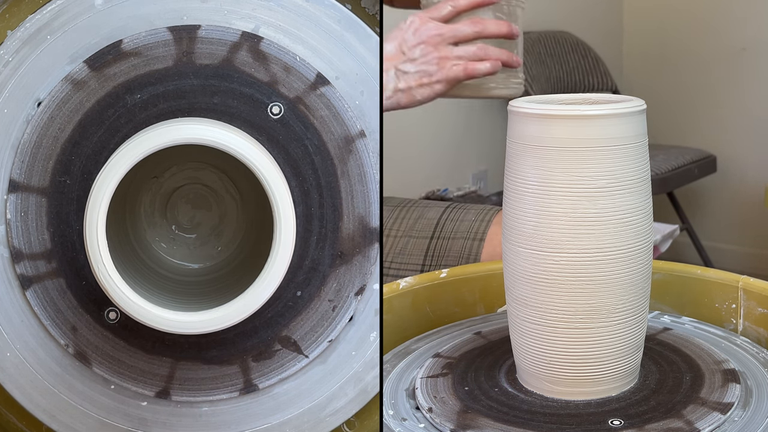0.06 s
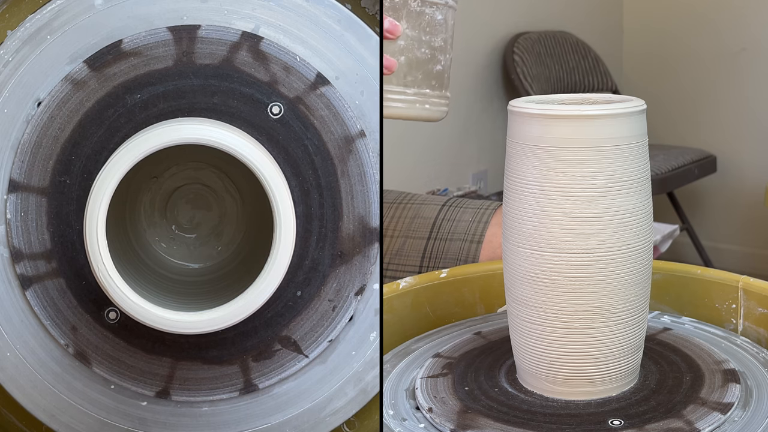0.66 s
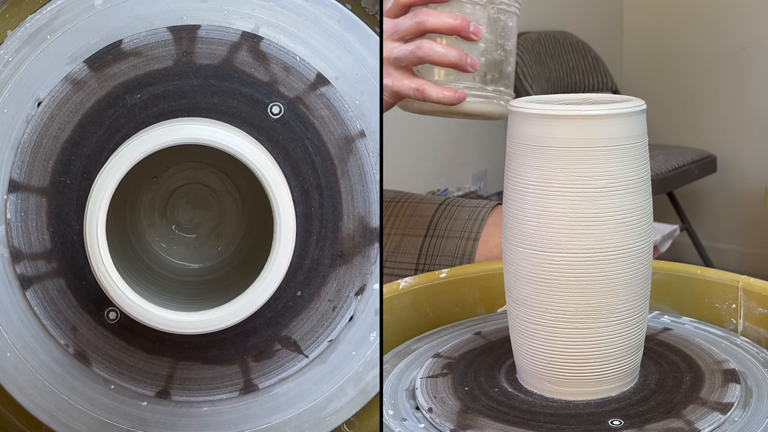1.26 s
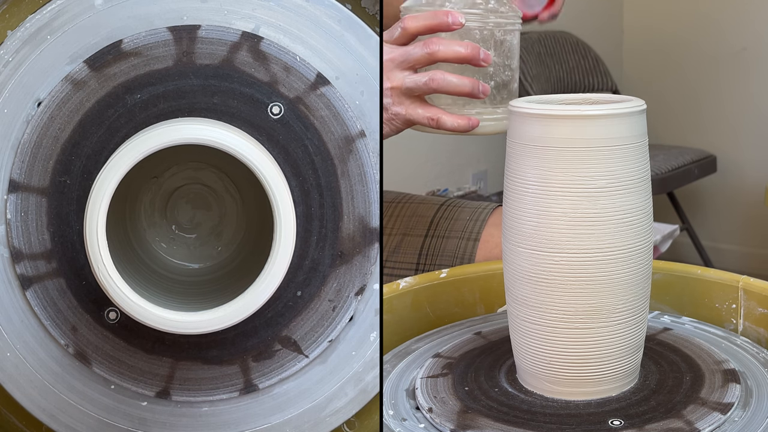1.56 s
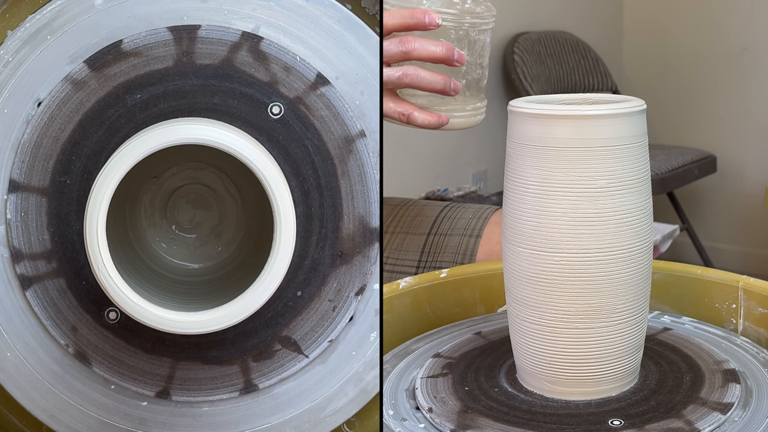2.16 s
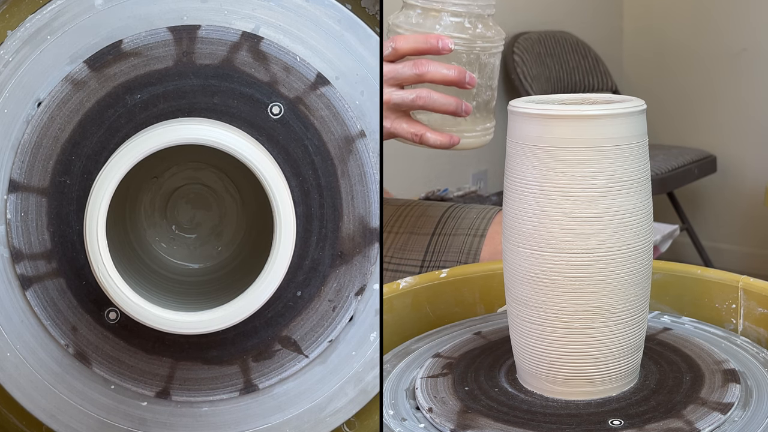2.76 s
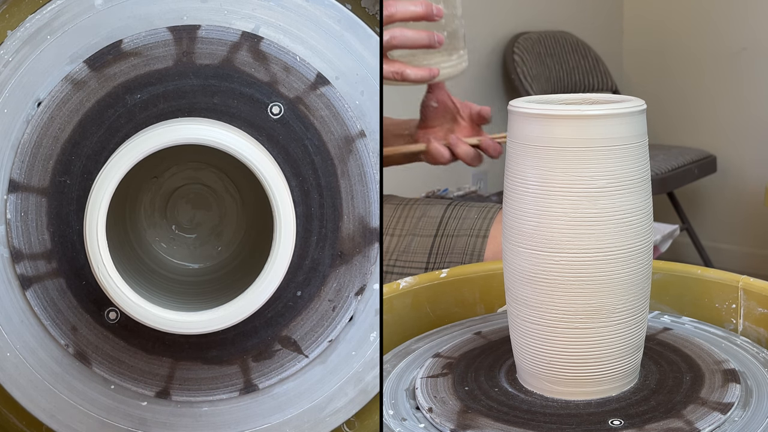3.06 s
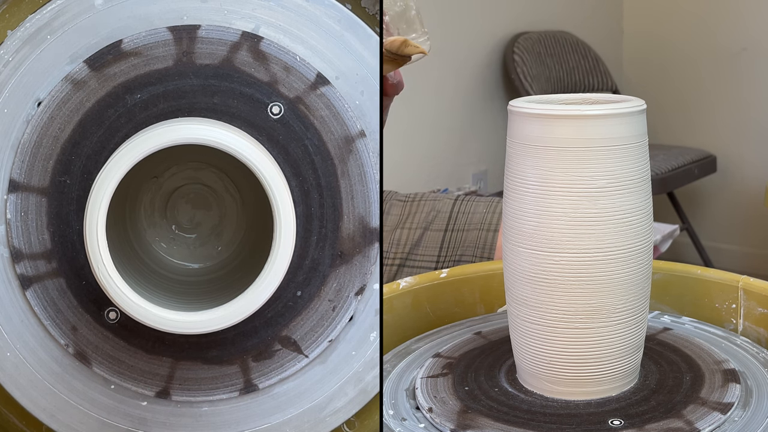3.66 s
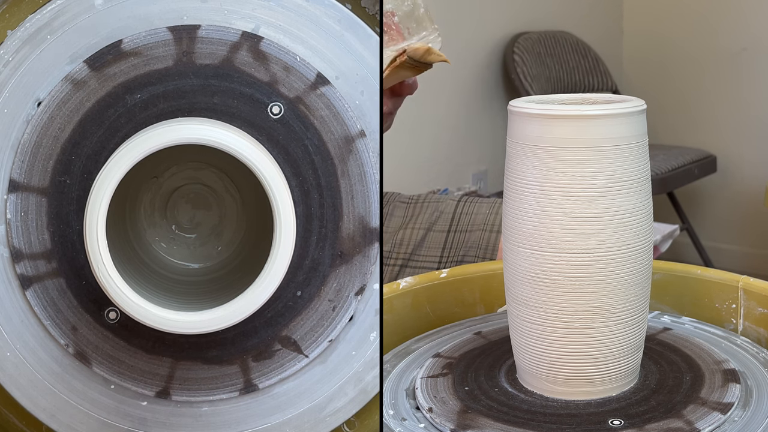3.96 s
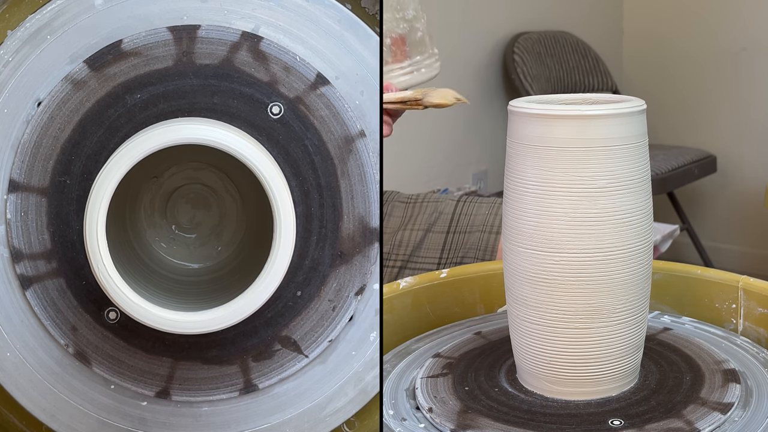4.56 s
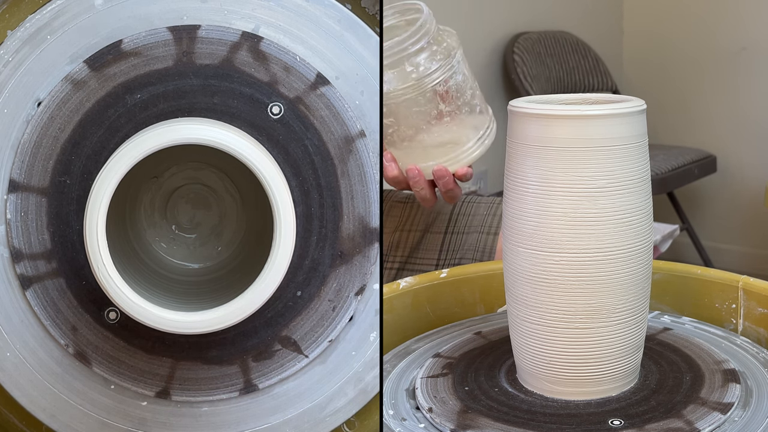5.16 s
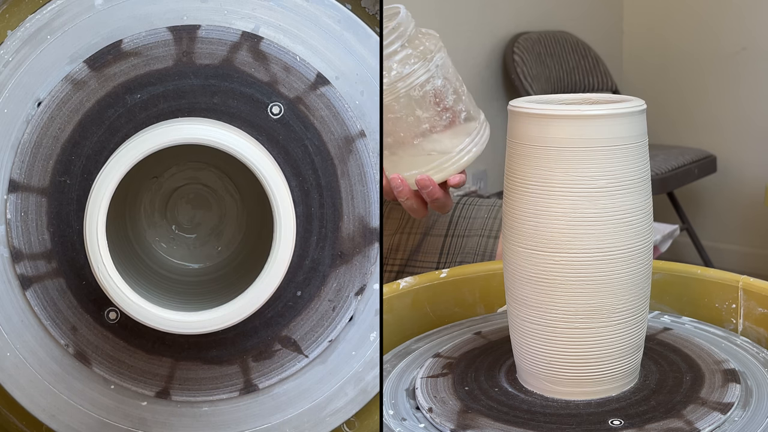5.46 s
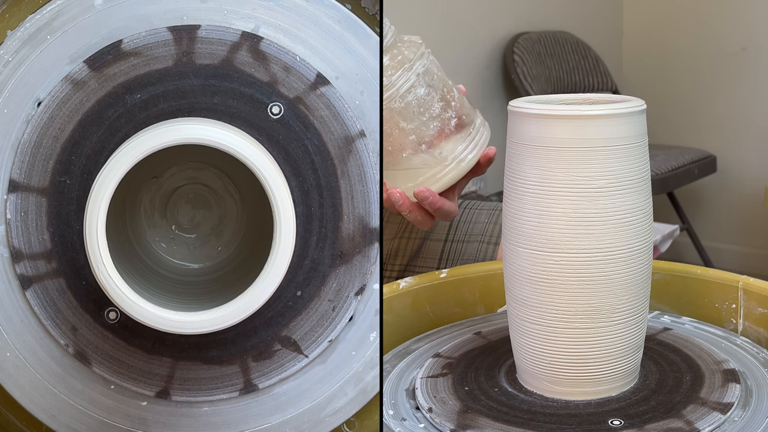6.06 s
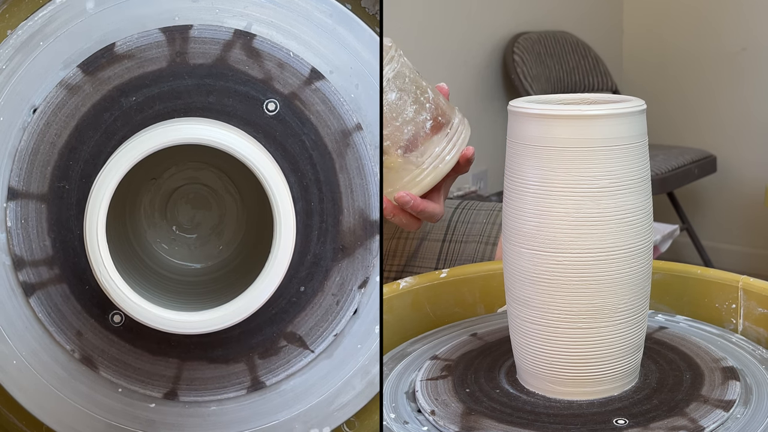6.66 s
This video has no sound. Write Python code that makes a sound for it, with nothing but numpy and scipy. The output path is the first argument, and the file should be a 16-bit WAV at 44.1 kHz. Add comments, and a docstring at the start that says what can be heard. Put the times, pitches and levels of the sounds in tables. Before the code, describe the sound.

Cloth rustles and fingers tick and bump softly on a held jar. Then a brush handle clatters against a glass in a quick run of bright, ringing clinks, scraping the rim as it is drawn out. A few light hollow taps and faint finger rubs follow, and near the end a pottery wheel motor starts to hum faintly. Close stereo microphones in a small, bare room with a low rumble.

```python
"""Brush drawn from a glass of tools

A potter handles a jar, then draws a brush from a glass of tools, clinking and scraping on the rim.
Fingers knock, rub and squeak on the held jar, cloth rustles, and near the end the wheel's motor
starts to hum. A small, bare studio, heard through a close stereo microphone pair."""
import sys
import numpy as np
from scipy import signal
from scipy.fft import rfft, irfft, next_fast_len
from scipy.io import wavfile

SR = 44100
rng = np.random.default_rng(int(sys.argv[2]) if len(sys.argv) > 2 else 0)


def transcribe(u):
    """Save the signal u as a 16-bit wav file named by the first command-line argument.

    u: samples, shape (n,) or (channels, n), limited to [-1, 1]; the rate is SR.
    q: integer samples, one column per channel.
    """
    v = np.clip(np.atleast_2d(u).T, -1, 1)
    q = np.round(v * 32767).astype(np.int16)
    wavfile.write(sys.argv[1], SR, q)


N = 304731
T = np.arange(N) / SR
RING_TIME = T[:SR]  # one second for each hit to ring out

# dry crack of a hard contact: (frequency [Hz], level [dB])
CRACK_SPECTRUM = [(30, -40.5), (150, -18.5), (600, -8), (1200, -9), (1900, -0.5), (2600, 4.5), (3200, -1),
                  (4200, 1), (6000, -5.5), (9000, -8.5), (12500, -17.5), (16000, -21)]


def clinks():
    """The brush handle cracks against the tool glass and bounces once; wall and hollow body ring."""
    # handle hits: (time [s], level [dB], hardness [Hz], body relative to wall [dB], bounce delay [s])
    hits = [(2.39, -67, 12000, 2.5, .002), (2.447, -56, 7400, 6.5, 0.0032), (2.456, -52.5, 5070, 3, 0.0017),
            (2.495, -41, 5000, -12, 0.0043), (2.5034, -21.5, 4630, -12, 0.0017),
            (2.528, -33.5, 9100, -3.5, 0.0036), (2.5376, -16.5, 13010, -6.5, .0018),
            (2.544, -24, 10000, -9, .002), (2.565, -32.5, 3500, -1, 0.0057), (2.676, -38, 3120, -11, .005),
            (2.791, -35, 3900, -19.5, 0.0057), (2.802, -50, 3540, -22, .009),
            (2.8834, -38, 3500, -26, 0.0057), (2.956, -41.5, 2990, -13.5, 0.0072),
            (3.0264, -38, 3070, -18.5, 0.0048)]
    # bright ring of the glass wall: (frequency [Hz], level [dB], t60 before damping [s])
    glass_modes = [(1380, -12.5, 0.19), (1621, -8.5, .1), (1754, -5, 0.11), (1910, -3.5, 0.34),
                   (1977, -2.5, .25), (1942, -3.5, 0.49), (2177, -4, 0.092), (2430, 1, 0.11),
                   (2510, -2, .15), (2470, 6.5, 0.091), (2585, 1, 0.29), (2660, -0.5, .15),
                   (2740, -5, 0.15), (3500, -3, .12), (3830, -0.5, 0.14), (4060, 0.5, 0.22),
                   (4460, -5.5, .18), (4524, -8.5, 0.15), (5040, -11, .2), (5300, -10, .16),
                   (5650, -8, .16), (6324, -4, .16), (6020, -6.5, .16), (6850, -6.5, .22), (7453, -8, .2),
                   (7640, -7, 0.13)]
    # hollow body, beating near 400 Hz: (frequency [Hz], level [dB], t60 before damping [s])
    body_modes = [(147.5, -13, 0.34), (281.2, -19.5, 0.092), (331.6, -9.5, 0.1), (353, -2.5, 0.11),
                  (389.4, 1.5, 0.17), (405.4, -2, .24), (578, -12, 0.16), (652, -10.5, 0.7),
                  (787.4, -12, 0.22), (954.4, -6.5, 0.06)]
    bounce_db = -5.5
    heaviest_db = max(hit[1] for hit in hits)
    wall, body = np.zeros((2, N))
    for s, db, hard_hz, body_db, bounce_s in hits:
        ring_db = -6.5 - 0.22 * (heaviest_db - db)  # lighter touches have less ring in their crack
        for delay_s, loss_db in (0, 0), (bounce_s, bounce_db):
            glass = undb(ring_db) * ring(glass_modes, damping=1.7, detune=0.0035)
            contact = crack(CRACK_SPECTRUM, t60=.028, chatter=.6)
            strike(wall, s + delay_s, db + loss_db, hard_hz, contact + glass)
        strike(body, s, db + body_db, hard_hz, ring(body_modes, damping=0.8, detune=.001))
    bright = studio(radiate(wall, corner_hz=169.9), wet_db=2.06, aside=.15)
    hollow = studio(radiate(body, corner_hz=70), wet_db=-9.5, aside=.3)
    return bright + hollow


def scrape():
    """The handle sticks and slips along the rim of the tool glass as it is drawn out."""
    # pulls over the rim: (time [s], rise [s], length [s], level [dB])
    drags = [(2.657, 0.018, 0.032, -47), (2.784, 0.026, .3, -47.5)]
    # rasp of the rim: (frequency [Hz], level [dB])
    rasp_spectrum = [(30, -22.5), (150, 3), (320, -2), (440, 3), (540, -3.5), (680, 5.5), (950, -6),
                     (1500, -1), (1800, -7.5), (2550, 5.5), (3200, -11), (4200, -10), (7000, -40),
                     (14000, -57)]
    slips = friction(rasp_spectrum, grain_db=4, patchy_db=4.5, patchy_hz=110)
    pull = sum(undb(db) * stroke(s, rise_s, length_s, release_db_per_s=185)
               for s, rise_s, length_s, db in drags)
    return studio(slips * pull, wet_db=-2, aside=.3)


def thumps():
    """Soft, dull thumps of handling; the last is a faint bump as the motor starts."""
    # thumps: (time [s], level [dB], hardness [Hz])
    hits = [(0.369, -55, 690), (0.393, -42.5, 1500), (.402, -48, 600), (.482, -46, 1160), (1.053, -45, 394),
            (1.198, -45.5, 443), (2.564, -39, 600), (2.987, -47, 600), (6.29, -57, 500), (6.52, -70, 1500)]
    # dull thud: (frequency [Hz], level [dB])
    thud_spectrum = [(20, -39), (60, -14), (130, 1.5), (300, 3), (520, -4), (1200, -4.5), (2500, -18.5),
                     (12000, -32)]
    out = np.zeros(N)
    for s, db, hard_hz in hits:
        strike(out, s, db, hard_hz, crack(thud_spectrum, t60=0.014, chatter=0.055))
    return studio(out, wet_db=-3.5, aside=.5)


def knocks():
    """Taps on the held jar sound short and hollow, because the fingers damp it."""
    # taps: (time [s], level [dB], hardness [Hz], body relative to wall [dB])
    taps = [(1.5306, -48, 7100, -6.5), (1.842, -56.5, 1790, -7.5), (3.525, -57, 5925, 7),
            (3.6248, -41.5, 4540, 6.5), (3.626, -51.5, 1990, 17), (4.329, -53.5, 6000, -5),
            (4.4304, -47, 4205, 10)]
    # wall of the held jar: (frequency [Hz], level [dB], t60 before damping [s])
    wall_modes = [(1700, -9, 0.033), (1940, 6, 0.01), (2090, 5.5, 0.038), (2400, -2.5, 0.027),
                  (2654, -3, 0.1), (3000, -4.5, 0.023), (3310, -3.5, 0.039), (3880, 1, 0.0047),
                  (5060, -22, 0.016)]
    # its hollow body: (frequency [Hz], level [dB], t60 before damping [s])
    body_modes = [(160, -6.5, 0.059), (461, -1, 0.056), (562, -6.5, 0.039), (698, 0, 0.016),
                  (828, -2, 0.02), (1030, -1.5, 0.035), (1260, 0, 0.0034)]
    out = np.zeros(N)
    for s, db, hard_hz, body_db in taps:
        wall = ring(wall_modes, damping=1.9, detune=0.011)
        contact = undb(-2.5) * crack(CRACK_SPECTRUM, t60=0.0099, chatter=0.74)
        body = undb(body_db) * ring(body_modes, damping=1.41, detune=0.0042)
        strike(out, s, db, hard_hz, wall + contact + body)
    return studio(out, wet_db=-1.5, aside=0.46)


def nail_ticks():
    """A fingernail catches the held jar with small, sharp ticks."""
    # nail contacts: (time [s], level [dB], hardness [Hz])
    ticks = [(0.132, -66.5, 12000), (0.207, -56.5, 16000), (0.3457, -55, 18000), (0.3651, -42, 11000),
             (1.533, -55, 12400), (6.288, -61.5, 6000)]
    # nail on the jar: (frequency [Hz], level [dB])
    nail_spectrum = [(200, 14), (1100, -15), (3500, 12), (7000, 5), (13000, 0), (16000, -15)]
    out = np.zeros(N)
    for s, db, hard_hz in ticks:
        strike(out, s, db, hard_hz, crack(nail_spectrum, t60=0.009, chatter=0.07))
    return studio(out, wet_db=1.5, aside=1.0)


def cloth_wipes():
    """A hand rubs over cloth: grainy hiss, a muffled rumble below and fine fibre hiss on top."""
    # strokes: (time [s], rise [s], length [s], level [dB], relative rumble [dB], relative fibres [dB])
    wipes = [(0.0, 0.0033, 0.068, -70.5, 6, -2.5), (0.116, 0.0067, 0.049, -65.5, -7, -1.5),
             (0.173, 0.028, 0.18, -54.5, -14, -2.5), (0.313, 0.028, 0.038, -54.5, -30, 6.5),
             (0.387, .015, 0.024, -50, -1, -15), (0.519, 0.053, 0.16, -74, 9.5, -9),
             (0.731, 0.038, 0.09, -47.5, -3, -6), (1.074, 0.035, 0.095, -47.5, -1.5, -8.5),
             (2.06, 0.018, 0.074, -80.5, 13, -15), (6.278, .012, .018, -54, -6, -14)]
    # the three layers of the rustle, each: (frequency [Hz], level [dB])
    hiss_spectrum = [(30, -2), (200, -7), (600, 0.5), (1150, 2.5), (1800, 0), (3000, 2.5), (4500, -3.5),
                     (7000, -5.5), (10000, -10), (13000, -16), (16000, -33)]
    rumble_spectrum = [(40, -23), (110, -6), (180, 1.5), (330, -4.5), (520, -13), (1000, -19.5),
                       (4000, -92)]
    fibre_spectrum = [(3000, -7), (7000, -17), (10000, 3.5), (13000, 0.5), (16000, -18)]
    hiss = friction(hiss_spectrum, grain_db=3, patchy_db=2.5, patchy_hz=200)
    rumble = friction(rumble_spectrum, grain_db=6, patchy_db=-1, patchy_hz=33)
    fibres = friction(fibre_spectrum, grain_db=2, patchy_db=4, patchy_hz=510)
    out = np.zeros(N)
    for s, rise_s, length_s, db, rumble_db, fibre_db in wipes:
        rustle = hiss + undb(rumble_db) * rumble + undb(fibre_db) * fibres
        out += undb(db) * stroke(s, rise_s, length_s, release_db_per_s=227) * rustle
    return studio(out, wet_db=-5.5, aside=0.79)


def slides():
    """Fingers and bristles rub faintly on the jar while it is turned."""
    # sliding touches: (time [s], length [s], hiss [dB], rub [dB])
    touches = [(1.468, 0.027, -70, -69.5), (1.778, 0.16, -69, -71), (1.965, 0.041, -69.5, -73.5),
               (2.054, .025, -80, -73), (3.366, 0.086, -91, -75.5), (3.509, 0.06, -74, -58),
               (3.656, .04, -66.5, -63), (3.751, 0.016, -75, -75), (4.05, 0.35, -86, -82),
               (4.306, 0.034, -76.5, -60), (4.494, 0.053, -67, -73.5), (4.684, 0.035, -74, -88),
               (5.13, 0.021, -73.5, -95), (5.29, 0.077, -80, -99), (5.495, 0.033, -64.5, -78),
               (5.538, 0.025, -89, -75.5), (5.659, 0.023, -75.5, -83), (5.821, 0.0083, -76, -98),
               (6.012, 0.052, -79, -74.5)]
    # fine hiss and coarser rub, each: (frequency [Hz], level [dB])
    hiss_spectrum = [(2000, -25), (4500, -3.5), (6200, 0.5), (8000, -2), (12500, 1.5), (16000, -5)]
    rub_spectrum = [(30, -43), (200, -1.5), (450, 5.5), (1100, -4.5), (1700, -1.5), (2300, 1), (3100, -3),
                    (4100, -5), (6500, -15), (12000, -37)]
    hiss = friction(hiss_spectrum, grain_db=1.5, patchy_db=1.5, patchy_hz=70)
    rub = friction(rub_spectrum, grain_db=5, patchy_db=4, patchy_hz=39)
    out = np.zeros(N)
    for s, length_s, hiss_db, rub_db in touches:
        movement = stroke(s, 0.43 * length_s, length_s, release_db_per_s=257)
        out += movement * (undb(hiss_db) * hiss + undb(rub_db) * rub)
    return studio(out, wet_db=-8.5, aside=0.89)


def squeaks():
    """A wet fingertip slips over the jar with a thin, narrow hiss."""
    # fingertip slips: (time [s], rise [s], length [s], level [dB], pitch [Hz])
    rubs = [(0.481, 0.14, 0.13, -62.5, 5360), (4.048, 0.035, .075, -82, 5520),
            (4.144, 0.069, .19, -77, 2250), (4.301, 0.013, 0.02, -70.5, 4060),
            (4.362, .015, .04, -80, 5530)]
    # narrow peak of the squeak: (frequency [multiple of the pitch], level [dB])
    peak = [(.2, -44), (.84, -23), (1, -1), (1.11, -12), (1.28, -20), (1.7, -23.5)]
    out = np.zeros(N)
    for s, rise_s, length_s, db, pitch_hz in rubs:
        slips = friction(np.array(peak) * [pitch_hz, 1], grain_db=2, patchy_db=4, patchy_hz=130)
        out += undb(db) * stroke(s, rise_s, length_s, release_db_per_s=152) * slips
    return studio(out, wet_db=-10, aside=0.43)


def motor():
    """Mains hum from the windings and a low rumble as the wheel begins to turn."""
    # magnetic hum: (frequency [multiple of the mains], relative level [dB])
    harmonics = [(1, 4.5), (2, -9), (4, 1), (6, -23), (8, -12), (10, -14.5)]
    # rumble of wheel and belt: (frequency [Hz], level [dB])
    wheel_spectrum = [(25, -23), (65, 14), (110, 10.5), (200, -7.5), (500, -7.5), (1200, -34),
                      (3000, -50.5)]
    mains_hz, start_s, spin_up_s = 60, 6.49, 0.079
    hum = sum(undb(db) * np.sin(2 * np.pi * (k * mains_hz * T + rng.random())) for k, db in harmonics)
    rumble = unit(colour(rng.standard_normal(N), wheel_spectrum))
    running = undb(-70.5) * np.sqrt(2) * hum + undb(-67) * rumble
    fade_in = np.clip((T - start_s) / spin_up_s, 0, 1)
    return studio(fade_in * running, wet_db=-9.5, aside=.8)


def room_tone():
    """Low rumble and faint hiss of the studio's air, gently wavering."""
    # still air: (frequency [Hz], relative mid [dB], relative side [dB])
    air_spectrum = [(20, -17, -24), (44.8, -4.5, -6), (68.85, 5.5, -2.5), (111.2, -1.5, -1.5),
                    (173, -14, -4), (349.9, -17, -6), (601.5, -24.5, -16), (869.7, -20, -16.5),
                    (1500, -35, -29.5), (2807, -37, -35), (6000, -40, -41.5), (9100, -42, -43),
                    (13000, -36, -36.5), (15500, -51, -45)]
    hz, mid_db, side_db = np.transpose(air_spectrum)
    air = np.array([colour(rng.standard_normal(N), np.c_[hz, db]) for db in (mid_db, side_db)])
    return air * undb(-42 + 1.3 * wander(rate_hz=5))


def room_tail():
    """Diffuse reflections build up quickly and die at each band's own rate; energy 1."""
    # the studio's ring: (frequency [Hz], t60 [s])
    decays = [(100, 0.37), (400, 0.46), (1000, .38), (2500, 0.35), (5000, 0.42), (9000, 0.24),
              (15000, 0.32)]
    build_s, size = 0.0031, len(RING_TIME)
    centres, t60s = np.transpose(decays)
    diffuse = np.exp(2j * np.pi * rng.random(size // 2 + 1))
    bands = [irfft(diffuse * on_bins(centres, weights, size)) for weights in np.eye(len(centres))]
    tail = sum(band * fade(t60) for band, t60 in zip(bands, t60s))
    tail *= 1 - np.exp(-(RING_TIME / build_s) ** 2)
    return tail / np.sqrt(np.sum(tail ** 2))


def studio(x, wet_db, aside):
    """Mid and side: direct sound reaching one microphone port first, plus the room."""
    direct = np.array([x, aside * np.gradient(x)])
    tails = np.array([signal.fftconvolve(x, room_tail())[:N] for _ in range(2)])
    return direct + undb(wet_db) * tails


def strike(track, s, db, hard_hz, response):
    """Add a hit at time s; a softer contact pushes longer and loses the treble above hard_hz."""
    softened = signal.sosfilt(signal.butter(2, hard_hz, fs=SR, output="sos"), response)
    start = int(s * SR)
    piece = track[start:start + len(RING_TIME)]
    piece += undb(db) * unit_hit(softened)[:len(piece)]


def ring(modes, damping, detune):
    """Modes of alternating sign, levels setting their energy; the grip detunes them a little."""
    shifts = 1 + detune * rng.standard_normal(len(modes))
    out = np.zeros(len(RING_TIME))
    for k, (hz, db, t60) in enumerate(modes):
        gain = (-1) ** k * undb(db) / np.sqrt(t60)
        out += gain * fade(t60 / damping) * np.sin(2 * np.pi * hz * shifts[k] * RING_TIME)
    return unit_hit(out)


def crack(spectrum, t60, chatter):
    """A sharp contact followed by a short burst of dense vibration."""
    burst = chatter * rng.standard_normal(len(RING_TIME)) * fade(t60)
    burst[0] += 1
    return unit_hit(colour(burst, spectrum))


def radiate(x, corner_hz):
    """A small object hardly radiates waves much longer than itself."""
    return signal.sosfilt(signal.butter(2, corner_hz, "high", fs=SR, output="sos"), x)


def friction(spectrum, grain_db, patchy_db, patchy_hz):
    """Dense tiny slips of uneven but bounded size, which come in patches."""
    sizes = np.minimum(rng.exponential(size=N), 4.5)
    slips = rng.standard_normal(N) * undb(grain_db * sizes)
    patches = undb(patchy_db * np.clip(wander(patchy_hz), -2, 2))
    return unit(colour(slips * patches, spectrum))


def stroke(s, rise_s, length_s, release_db_per_s):
    """Envelope of a rub: it gathers speed, holds until its length is over and dies away."""
    attack = np.clip((T - s) / rise_s, 0, 1)
    return attack * undb(-release_db_per_s * np.maximum(T - s - length_s, 0))


def colour(x, spectrum):
    """Minimum-phase EQ through points of (frequency [Hz], level [dB])."""
    size = 2 * next_fast_len(len(x))
    cepstrum = irfft(np.log(undb(on_bins(*np.transpose(spectrum), size))))
    cepstrum[1:size // 2] *= 2
    cepstrum[size // 2 + 1:] = 0
    return irfft(rfft(x, size) * np.exp(rfft(cepstrum)))[:len(x)]


def on_bins(hz, values, size):
    """Values joined on a log-frequency axis, at every bin of a transform."""
    return np.interp(np.log(np.maximum(np.fft.rfftfreq(size, 1 / SR), 1)), np.log(hz), values)


def wander(rate_hz):
    """Random drift with a spread near 1."""
    knots = rng.standard_normal(4096)
    return np.interp(T * rate_hz, np.arange(len(knots)), knots)


def fade(t60):
    """Decay that falls 60 dB in t60 seconds."""
    return np.exp(-np.log(1000) * RING_TIME / t60)


def undb(db):
    """Decibels to gain."""
    return 10 ** (np.asarray(db) / 20)


def unit(x):
    """Scale to rms 1."""
    return x / np.sqrt(np.mean(x ** 2))


def unit_hit(x):
    """Scale a hit to the energy of 10 ms at rms 1."""
    return x * np.sqrt(.01 * SR / np.sum(x ** 2))


def scene():
    """All sources through the microphone's two ports, as left and right."""
    # the ports, in opposite phase near 10 kHz: (frequency [Hz], mid [dB], side [dB])
    port_response = [(100, -2.5, -15), (366, 0.5, -9), (682, -1, 1), (1801.5, -1.5, -6.5), (3040, -2.5, -2),
                     (4970, -6, -5.5), (5800, -2.5, -6), (7814, -4, -1.5), (9247, -11, 2), (9964, -35, 1.5),
                     (12220, -1.5, -0.5), (13500, -6.5, -5), (15670, -3, -29.5)]
    hz, mid_db, side_db = np.transpose(port_response)
    brush = clinks() + scrape()
    small_sounds = thumps() + knocks() + nail_ticks() + cloth_wipes() + slides() + squeaks()
    mid, side = brush + small_sounds + motor() + room_tone()
    mid, side = colour(mid, np.c_[hz, mid_db]), colour(side, np.c_[hz, side_db])
    return np.array([mid + side, mid - side]) * undb([[-.25], [.25]])  # leans slightly right


def record(dry):
    """A steep low-pass cuts the very top."""
    top_hz = 15720
    return signal.sosfilt(signal.ellip(10, .2, 70, top_hz, fs=SR, output="sos"), dry)


dry = scene()
out = record(dry)
transcribe(out)
```